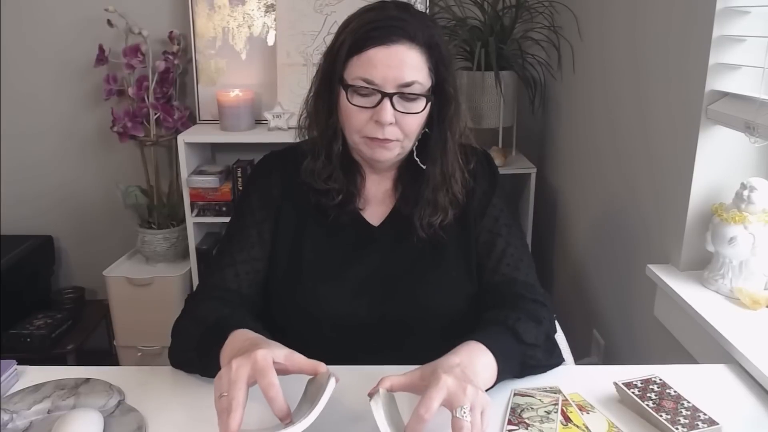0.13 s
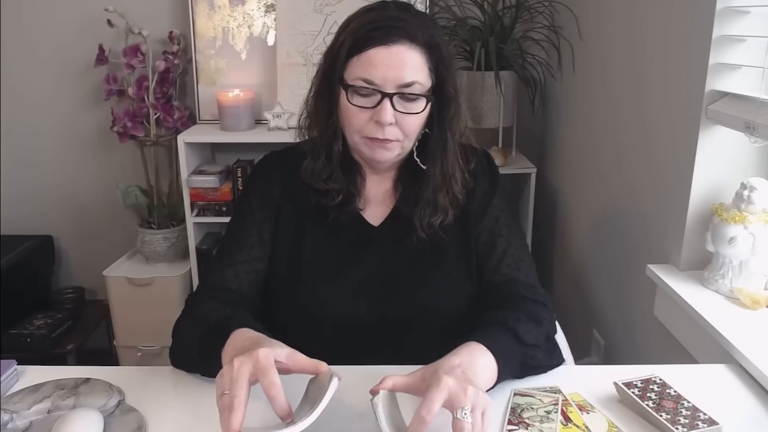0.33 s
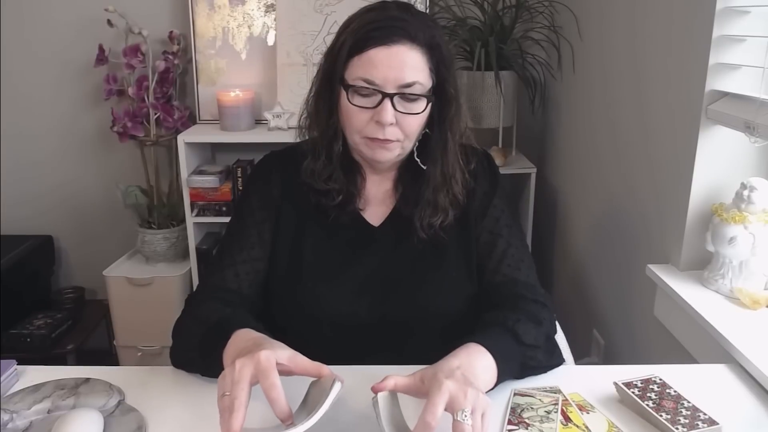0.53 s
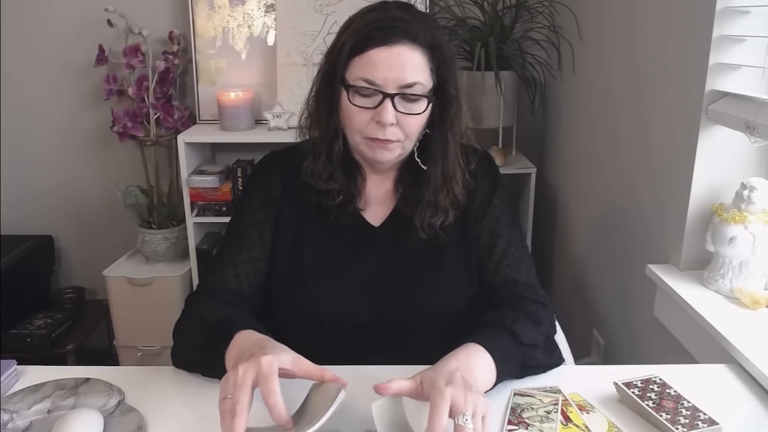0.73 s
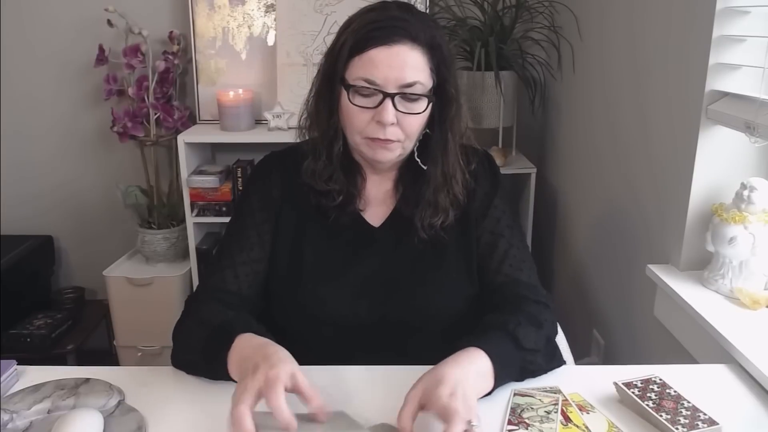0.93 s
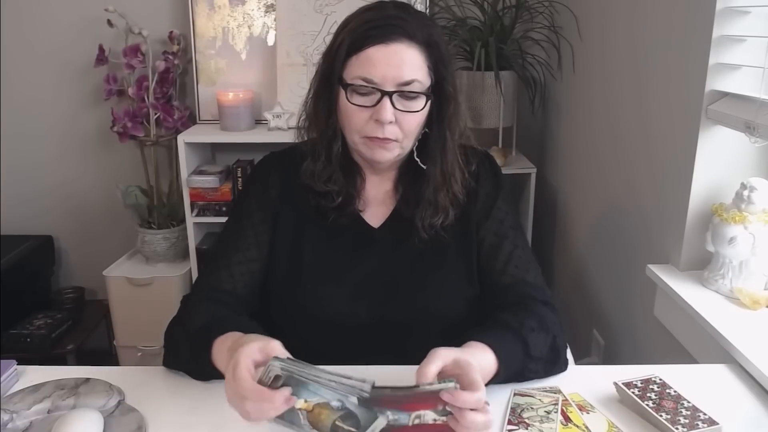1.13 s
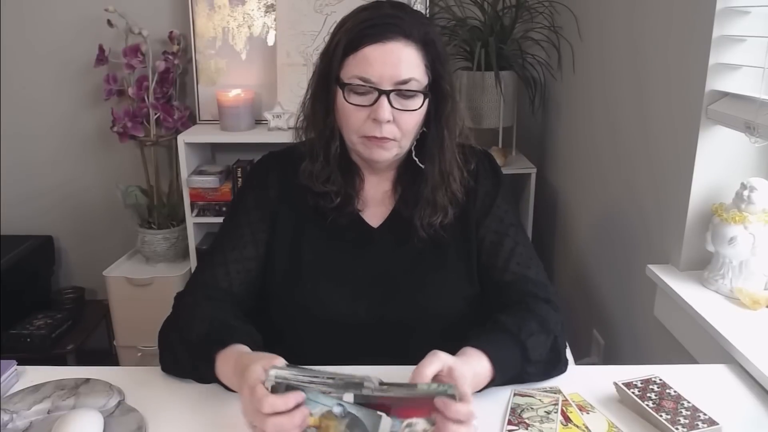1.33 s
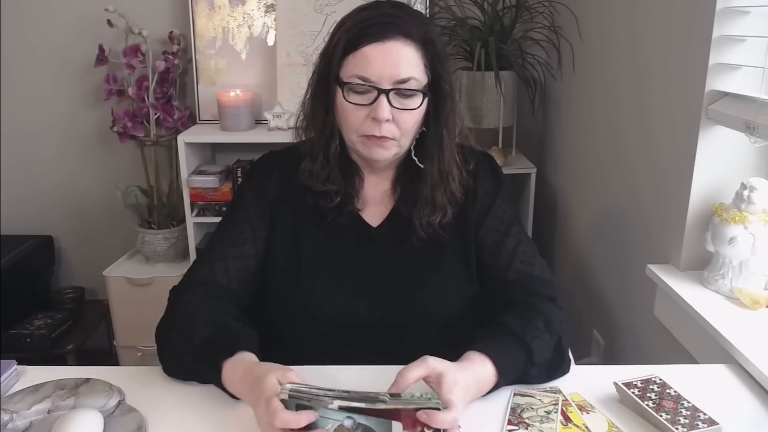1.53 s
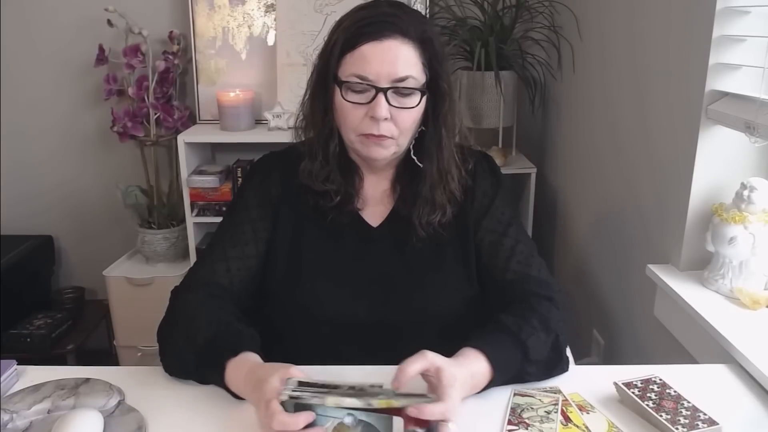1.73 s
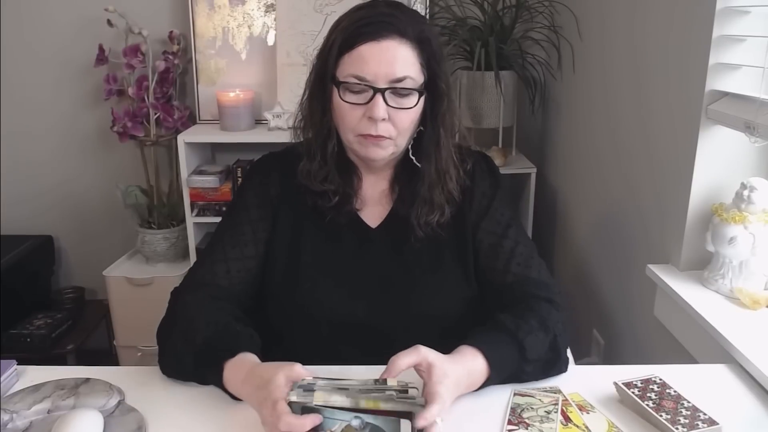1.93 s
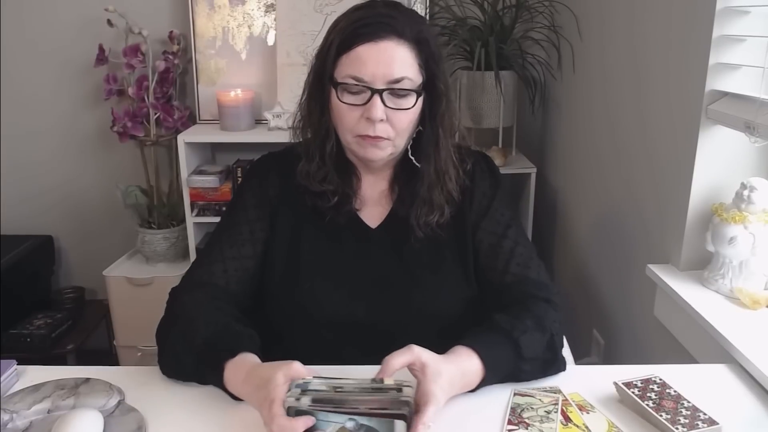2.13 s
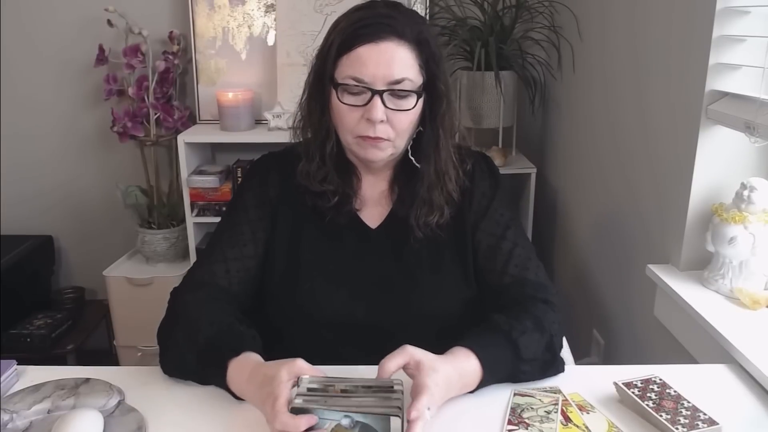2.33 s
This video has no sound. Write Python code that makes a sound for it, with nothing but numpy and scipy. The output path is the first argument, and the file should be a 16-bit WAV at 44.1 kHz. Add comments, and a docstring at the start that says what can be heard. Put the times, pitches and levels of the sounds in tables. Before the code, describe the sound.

A deck of cards is riffle-shuffled on a hollow table, then slapped and slid together

```python
"""Card riffle on a hollow table

A deck is riffled onto a hollow wooden table, then the halves are bent and slide together.
Corners snap off the thumbs, then cards slap: bunches of random clicks, each led by one strong crack.
Under them runs a papery flutter of finer clicks and hiss, with short pitched knocks of the pack.
The table booms as damped modes under the hands; table and stand shake as low resonant noise.
Cards echo in a small dull room over a soft hush, and a faint thin tone comes in at the end."""
import sys
import numpy as np
from scipy import signal
from scipy.fft import rfft, irfft
from scipy.io import wavfile

SR = 44100
rng = np.random.default_rng(int(sys.argv[2]) if len(sys.argv) > 2 else 0)


def waveform_to_disk(signal):
    """Save audio, clipped to [-1, 1], as 16-bit WAV at the path in sys.argv[1]."""
    frames = np.transpose(np.atleast_2d(signal))
    scaled = np.clip(frames, -1, 1) * 32767
    samples = np.round(scaled).astype(np.int16)
    wavfile.write(sys.argv[1], SR, samples)


def volts_from_db(level):
    """Convert decibel levels to linear amplitude ratios."""
    exponent = np.asarray(level, float) / 20
    return 10 ** exponent


N = 109941  # length in samples


def rms_one(x):
    """Scale to rms 1."""
    return x / np.sqrt(np.mean(x ** 2) + 1e-20)


def in_time(rows):
    """Draw each column of a breakpoint table as a straight-line curve, sample by sample."""
    s, *columns = np.transpose(rows)
    return [np.interp(np.arange(N) / SR, s, column) for column in columns]


def colour(x, points):
    """Shape a signal by a spectrum with minimum phase, so nothing sounds early."""
    size = 2048
    hz, db = np.transpose(points)
    bins_hz = np.arange(size // 2 + 1) * SR / size
    gain_db = np.interp(np.log(bins_hz + 1), np.log(hz), db)
    cepstrum = irfft(np.log(volts_from_db(gain_db)))
    # folding the cepstrum onto positive time gives the minimum phase
    cepstrum[1:size // 2] *= 2
    cepstrum[size // 2 + 1:] = 0
    response = irfft(np.exp(rfft(cepstrum)))
    return signal.fftconvolve(x, response)[:N]


def ring(x, hz, t60):
    """Two-pole resonator: a unit click sets a dying sine of starting height 1 ringing."""
    radius = volts_from_db(-60 / (t60 * SR))
    turn = 2 * np.pi * hz / SR
    return signal.lfilter([0, np.sin(turn)], [1, -2 * radius * np.cos(turn), radius ** 2], x + 1e-18)


# spectrum of the room hush, shape only: pitch_hz [Hz], level_db [dB]
HUSH_COLOUR = [(59, -31), (100, 3.5), (177, 16.5), (283, -10), (558, -4), (705, -4), (1580, -19),
               (7940, -12), (16000, -25)]
HUSH_DB = -57.5  # rms


def room_hush():
    """Steady noise, coloured by the hush spectrum."""
    return volts_from_db(HUSH_DB) * rms_one(colour(rng.standard_normal(N), HUSH_COLOUR))


def tone():
    """A faint thin sine fades in near the end."""
    start_s, rise_s, pitch_hz, peak_db = 2.44, 0.018, 810, -51
    t = np.arange(N) / SR
    fade = np.clip((t - start_s) / rise_s, 0, 1)
    return volts_from_db(peak_db) * fade * np.sin(2 * np.pi * pitch_hz * t)


# slow shaking through the stand: start_s [s], lower_level_db [dB], upper_level_db [dB]
SHAKE_LEVELS = [(0.0, -39, -34), (0.15, -28.5, -35), (0.21, -46, -35.5), (0.56, -44.5, -54),
                (0.64, -43, -26), (0.75, -48, -26), (0.778, -20, -22.5), (0.83, -53, -36.5),
                (0.85, -34.5, -51), (1.32, -45.5, -47), (1.43, -47, -62), (1.521, -15.5, -23),
                (1.6, -31, -49), (1.64, -45, -39.5), (2.24, -46.5, -68), (2.39, -37, -44), (2.49, -63, -45)]
# the lower and the upper resonance: pitch_hz [Hz]
SHAKE_PITCHES = (29.2, 68.6)
# how broad each resonance is: width_hz [Hz]
SHAKE_WIDTHS = (31, 24)


def shake():
    """Two low resonances of table and stand, driven by noise; each is two resonators in a row."""
    out = 0
    for db, hz, width_hz in zip(in_time(SHAKE_LEVELS), SHAKE_PITCHES, SHAKE_WIDTHS):
        t60 = 1.4 / width_hz  # broader means shorter
        rumble = ring(ring(rng.standard_normal(N), hz, t60), hz, t60)
        out = out + volts_from_db(db) * rms_one(rumble)
    return out


# hands and deck bumping the table: start_s [s], level_db [dB], favoured pitch_hz [Hz]
TABLE_BUMPS = [(0.082, -44, 110), (0.361, -30.5, 133), (0.47, -34.5, 173), (0.626, -35, 150),
               (0.706, -20, 145), (0.77, -13.5, 111), (0.926, -18.5, 171), (0.988, -28.5, 172),
               (1.348, -36, 188), (1.478, -15.5, 167), (1.501, -13, 160), (1.671, -26, 135),
               (1.831, -20.5, 180), (1.872, -16.5, 184), (1.926, -20.5, 181), (1.961, -19.5, 192),
               (2.006, -21.5, 180), (2.243, -26, 172), (2.311, -23, 155), (2.344, -19, 149)]
# modes of the table top: pitch_hz [Hz], level_db [dB], t60_s [s]
TABLE_MODES = [(127, -5.5, 0.052), (150.8, 1, 0.097), (165.7, 1, 0.12), (189.8, 2.5, 0.083),
               (249.7, -4, 0.059)]
# table kept ringing by the hands, ahead of the softening: start_s [s], level_db [dB]
HUM_LEVELS = [(0.0, -41.5), (0.38, -46), (0.81, -44.5), (1.05, -56), (1.46, -48.5), (1.6, -46), (2.0, -36),
              (2.2, -42.5), (2.36, -38.5), (2.49, -55.5)]
BUMP_PRESS_S, BUMP_SOFT_HZ = 0.016, 306
BUMP_FOCUS_DB = 9.5  # loss per octave between a mode and the favoured pitch
BUMP_LUCK_DB = 1.5  # random spread of each mode in each bump


def table():
    """Soft bumps and steady rubbing ring the modes of the table top; each bump swells over its press."""
    s, db, favoured_hz = np.transpose(TABLE_BUMPS)
    luck_db = rng.normal(0, BUMP_LUCK_DB, (len(s), len(TABLE_MODES)))
    rub = rng.standard_normal(N)
    press_t = np.arange(int(BUMP_PRESS_S * SR)) / SR
    booms, hum = 0, 0
    for k, (hz, mode_db, t60) in enumerate(TABLE_MODES):
        octaves_off = np.abs(np.log2(hz / favoured_hz))
        clicks = np.zeros(N)
        clicks[(s * SR).astype(int)] = volts_from_db(db + mode_db + luck_db[:, k] - BUMP_FOCUS_DB * octaves_off)
        # pushing at the mode's own pitch builds it up over the press
        press = 2 * np.cos(2 * np.pi * hz * press_t) / len(press_t)
        booms = booms + ring(np.convolve(clicks, press)[:N], hz, t60)
        hum = hum + volts_from_db(mode_db) * ring(rub, hz, t60)
    hum = volts_from_db(in_time(HUM_LEVELS)[0]) * rms_one(hum)
    soft = signal.butter(2, BUMP_SOFT_HZ, fs=SR, output="sos")
    return signal.sosfilt(soft, booms + hum)


def room(x):
    """Dense dull echoes: dying noise with its treble softened, scaled to unit energy."""
    t60_s, wall_cut_hz, gap_s = 0.21, 6900, 0.003
    t = np.arange(SR // 2) / SR
    tail = rng.standard_normal(len(t)) * volts_from_db(-60 * t / t60_s) * (t > gap_s)
    tail = signal.sosfilt(signal.butter(1, wall_cut_hz, fs=SR, output="sos"), tail)
    return signal.fftconvolve(x, tail / np.sqrt(np.sum(tail ** 2)))[:N]


# spectrum of the riffling cards, shape only: pitch_hz [Hz], density_db [dB per Hz]
RIFFLE_SPECTRUM = [(180, -10.5), (330, 3.5), (600, -3.5), (1400, -3), (3000, -1), (7000, 4), (12500, 6),
                   (16500, 0.5)]
# spectrum of the sliding halves, shape only: pitch_hz [Hz], density_db [dB per Hz]
SLIDE_SPECTRUM = [(180, -34), (300, -5.5), (750, -11), (1400, -2.5), (2600, -1.5), (4900, -5.5),
                  (8000, -16), (16500, -30.5)]
# edges of the low, middle and high band: edge_hz [Hz]
BAND_EDGES = [300, 2000, 6000, 17000]
HALVES_MEET_S = 1.2  # riffle colour before, slide colour after


def paper(levels, per_s, spread_db, hiss, cracks=0):
    """Random clicks of uneven size over hiss, gated, then coloured by the cards in three bands.

    levels: gain curves of the middle, low and high band; hiss: its rms against the clicks."""
    sizes = volts_from_db(spread_db * np.minimum(rng.exponential(1, N), 3)) * rng.choice([-1, 1], N)
    clicks = rms_one(sizes * (rng.random(N) < per_s / SR))
    grains = rms_one(clicks + hiss * rng.standard_normal(N)) + cracks
    riffling = np.arange(N) < HALVES_MEET_S * SR
    impulse = signal.unit_impulse(N)
    out = 0
    for level, k in zip(levels, (1, 0, 2)):
        band = signal.butter(2, BAND_EDGES[k:k + 2], "band", fs=SR, output="sos")
        sign = (-1) ** k  # the middle band is flipped
        for part, points in ((riffling, RIFFLE_SPECTRUM), (~riffling, SLIDE_SPECTRUM)):
            response = signal.sosfilt(band, colour(impulse, points)[:4096])
            gain = np.sqrt(np.sum(response ** 2))
            out = out + sign * signal.sosfilt(band, colour(level * grains * part, points)) / gain
    return out


# paper flutter between the snaps: start_s [s],
# middle_level_db [dB, 2-6 kHz], low_level_db [dB, below 2 kHz], high_level_db [dB, above 6 kHz]
FLUTTER_LEVELS = [(0, -42.5, -42.5, -33.5), (.045, -53.5, -55, -48), (.06, -47, -41.5, -29),
                  (.15, -54, -53.5, -51), (.2, -46, -47.5, -34), (.27, -49, -51, -34), (.33, -55, -52, -57),
                  (.35, -44, -40, -39), (.44, -56.5, -55, -63), (.47, -50, -46, -43.5),
                  (.565, -56.5, -53, -55), (.62, -52.5, -45, -37), (.69, -32, -43.5, -39.5),
                  (.8, -39, -37, -30), (.87, -49, -49.5, -48), (1.0, -61, -65, -72),
                  (1.44, -100, -67.5, -65), (1.475, -81, -38.5, -53), (1.51, -41, -27.5, -34),
                  (1.56, -31.5, -31, -61), (1.655, -48.5, -43, -53), (1.68, -30.5, -35, -33.5),
                  (1.822, -39, -44, -42), (1.85, -34, -29.5, -41), (1.94, -30.5, -25.5, -34),
                  (2.03, -44, -42, -64), (2.13, -43, -43, -84), (2.16, -38.5, -40, -48),
                  (2.3, -42.5, -43.5, -57), (2.34, -34.5, -39, -69), (2.42, -46.5, -54, -77),
                  (2.49, -59, -53.5, -87)]
# a hand brushes past: middle_s [s], middle_level_db, low_level_db, high_level_db [dB], width_s [s]
HAND_SWELLS = [(1.102, -63, -78, -58, 0.023), (1.348, -86, -56, -50, 0.047)]
FLICKS_PER_S, FLICK_T60_S = 230, 0.019
FLICK_SHARE = 0.94  # weight of the flicks against a steady stream of 1


def flutter():
    """Many small edges brush past each other; single cards flick out, each with its own colour."""
    t = np.arange(N) / SR
    power = volts_from_db(np.array(in_time(FLUTTER_LEVELS))) ** 2
    flicks = rng.random((3, N)) ** 2 * 2 * (rng.random(N) < FLICKS_PER_S / SR)
    dying = signal.lfilter([1], [1, -volts_from_db(-60 / (FLICK_T60_S * SR))], flicks)
    power = power * rms_one(1 + FLICK_SHARE * dying) ** 2
    for s, *db, width in HAND_SWELLS:
        swell = np.exp(-((t - s) / width) ** 2 * 2)
        power = power + (volts_from_db(np.array(db))[:, None] * swell) ** 2
    return paper(np.sqrt(power), per_s=2500, spread_db=2, hiss=1)


# the pack knocks with a short pitch: start_s [s], level_db [dB], pitch_hz [Hz], t60_s [s]
PACK_KNOCKS = [(.05, -20, 1343, 0.025), (.07, -27.5, 1350, .035), (.09, -20, 1430, 0.02),
               (.3388, -14.5, 1970, 0.014), (.3402, -15.5, 2750, 0.0099), (0.665, -25, 740, 0.03),
               (.778, -24, 1330, 0.039), (1.499, -16, 1066, 0.077), (1.4985, -13.5, 2520, 0.054),
               (1.515, -21, 2506, 0.15), (1.666, -5, 4930, 0.01), (1.667, -26.5, 636, 0.033),
               (1.713, -18.5, 2760, 0.022), (1.829, -14, 4800, 0.016), (1.871, -5.5, 4700, 0.005),
               (1.932, -11, 2910, .02), (2.2405, -21, 1980, 0.023), (2.342, -20, 3020, 0.013)]


def knocks():
    """Short rings of the pack, each one struck resonator."""
    out = 0
    for s, db, hz, t60 in PACK_KNOCKS:
        out = out + volts_from_db(db) * ring(signal.unit_impulse(N, int(s * SR)), hz, t60)
    return out


# corners snapping off the thumbs, levels ahead of the trim: start_s [s], middle_level_db [dB, 2-6 kHz],
# low_level_db [dB, below 2 kHz], high_level_db [dB, above 6 kHz], t60_s [s, at least 0.003 is used]
CORNER_SNAPS = [(0.0492, -18.5, -24, -8.5, 0.013), (0.07, -30, -24, -16, 0.029),
                (.088, -26, -16, -17, 0.031), (0.1107, -25, -23, -23, 0.068),
                (0.173, -19.5, -28, -22, 0.02), (0.1949, -24.5, -16, -4, 0.016),
                (0.206, -47, -42, -9.5, 0.071), (0.2298, -20.5, -27.5, -15.5, 0.06),
                (0.2563, -26, -23, -13.5, 0.028), (0.3385, -20.5, -16, -16.5, 0.0087),
                (0.3597, -18, -23, -36, 0.017), (.46, -26, -33, -29.5, 0.022),
                (0.508, -33, -36, -36, 0.014), (0.575, -38, -25.5, -19, 0.073),
                (0.615, -13.5, -20.5, -20, 0.037), (0.655, -23, -35, -19, 0.014),
                (0.663, -10.5, -14.5, -14, 0.019), (.703, -11, -14, -18, 0.02),
                (0.724, -14.5, -18.5, -33, 0.084), (0.7538, -17, -16.5, -26, 0.011),
                (0.7639, -17, -15, -17, 0.042), (0.778, -17, -14.5, -19, 0.015),
                (0.789, -9, -29, -10, 0.025), (0.8065, -27, -33, -9.5, 0.0073),
                (0.818, -28, -26, -17, 0.013), (0.831, -18, -52, -30, 0.023), (0.917, -37, -27, -38, 0.017)]
# cards slapping together in the bent deck: start_s [s],
# middle_level_db, low_level_db, high_level_db [dB], t60_s [s], bands and trim as above
CARD_SLAPS = [(1.4568, -63, -26, -50, 0.04), (1.481, -36, -15, -40, 0.047), (1.4886, -38, -8, -33, 0.081),
              (1.4984, -1.5, -8.5, -19, 0.043), (1.506, -4.5, -15, -36, 0.029),
              (1.5476, -13, -14, -43, 0.032), (1.6653, -5, -21, -8, 0.016), (1.7136, -4, -32, -15, 0.043),
              (1.7174, -15.5, -10.5, -16, 0.033), (1.828, -18, -12, -19.5, 0.04),
              (1.8699, -11.5, -7, -39, 0.0055), (1.883, -12.5, -17, -17, 0.011),
              (1.892, -6, -16.5, -20, 0.021), (1.92, -7.5, -35, -13, 0.022),
              (1.9313, -5.5, -17, -35, 0.019), (2.0054, -10.5, -19.5, -15, 0.017),
              (2.0505, -16, -26.5, -39, 0.055), (2.0846, -19.5, -38, -43, 0.054),
              (2.144, -18.5, -33, -32, 0.15), (2.2373, -13, -25, -26, 0.024),
              (2.3091, -26, -20.5, -33, 0.02), (2.325, -12.5, -28.5, -16.5, 0.035),
              (2.341, -20, -23, -33, 0.022), (2.348, -15, -14, -24.5, 0.027)]
# trim of the middle, low and high band: level_db [dB]
SNAP_TRIM = [-13, -13, -11.5]
SNAP_RISE_S, SNAP_HOLD_S = 0.0005, 0.0028  # both counted from the start
CRACK_DB, CRACK_LUCK_DB = 14.5, 3  # the first click of a bunch stands out, by a random amount


def snaps():
    """Each snap or slap opens a bunch of clicks, holds it a moment and lets it die."""
    events = CORNER_SNAPS + CARD_SLAPS
    t = np.arange(SR // 5) / SR
    power = np.zeros((3, N + SR))
    cracks = np.zeros(N)
    luck = rng.standard_normal((len(events), 2))
    for (s, *db, t60), (size, side) in zip(events, luck):
        i = int(s * SR)
        cracks[i + int(SNAP_RISE_S * SR)] = volts_from_db(CRACK_DB + CRACK_LUCK_DB * size) * np.sign(side)
        rise = np.minimum(t / SNAP_RISE_S, 1)
        fall = volts_from_db(-60 * np.maximum(t - SNAP_HOLD_S, 0) / max(t60, 0.003))
        power[:, i:i + len(t)] += (volts_from_db(np.add(db, SNAP_TRIM))[:, None] * rise * fall) ** 2
    return paper(np.sqrt(power[:, :N]), per_s=4500, spread_db=3.5, hiss=1, cracks=cracks)


ROOM_DB = -12.5  # echoes against the dry cards


def scene():
    """Cards with their echoes, table, stand, thin tone and room hush."""
    cards = snaps() + knocks() + flutter()
    echoes = volts_from_db(ROOM_DB) * room(cards)
    mix = cards + echoes + table() + shake() + tone() + room_hush()
    return mix[None]


def low_pass(x):
    """Removes everything above the highest recorded frequency."""
    return signal.sosfilt(signal.butter(12, 16860, fs=SR, output="sos"), x)


def record(dry):
    """Peaks are rounded smoothly towards a ceiling, then the top treble is cut."""
    ceiling, cutoff_hz = 0.9, 16800
    rounded = ceiling * np.tanh(dry / ceiling)
    steep_cut = signal.cheby2(12, 70, cutoff_hz, fs=SR, output="sos")  # 70 dB down from the cutoff up
    mix = signal.sosfilt(steep_cut, rounded)
    return low_pass(mix)


dry = scene()
out = record(dry)
waveform_to_disk(out)
```